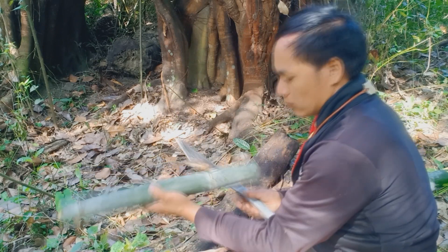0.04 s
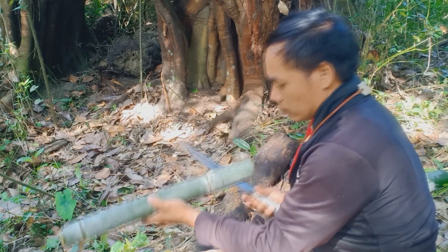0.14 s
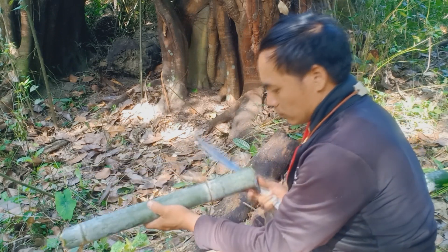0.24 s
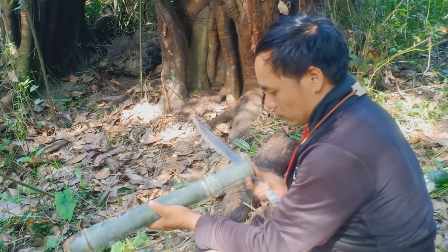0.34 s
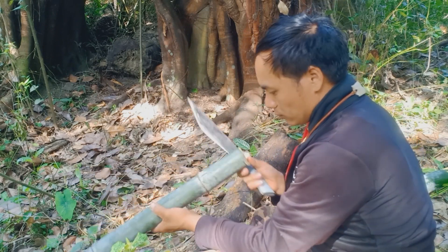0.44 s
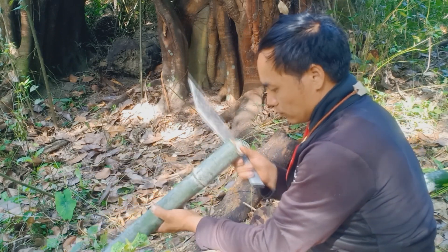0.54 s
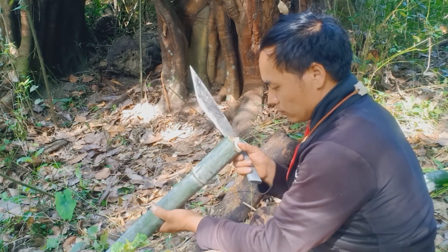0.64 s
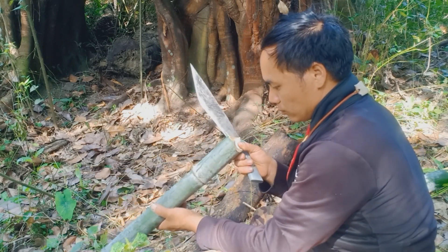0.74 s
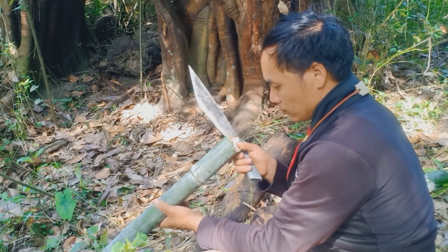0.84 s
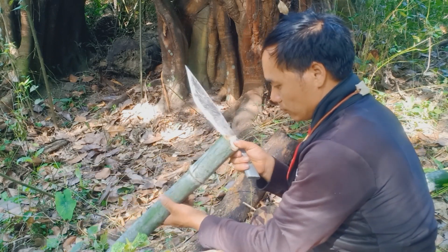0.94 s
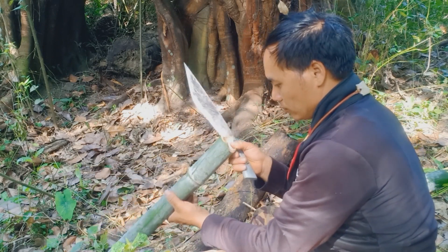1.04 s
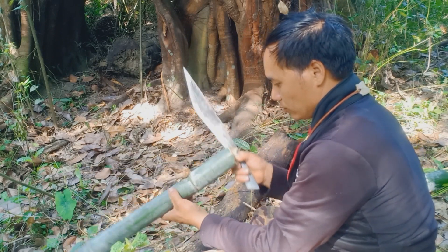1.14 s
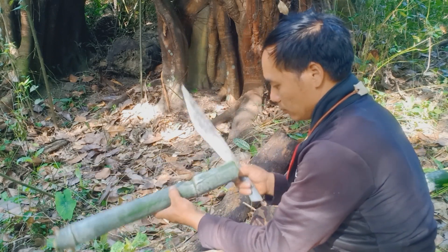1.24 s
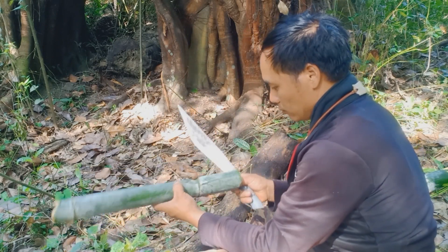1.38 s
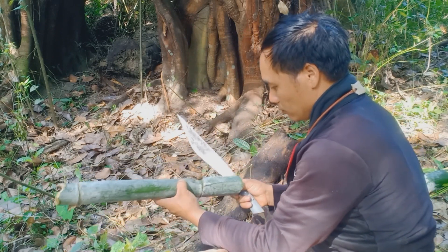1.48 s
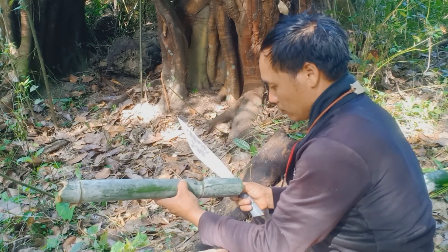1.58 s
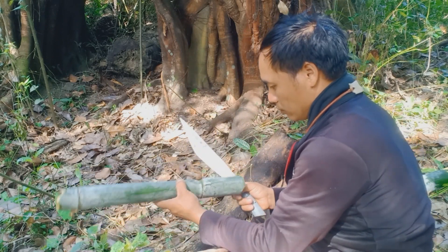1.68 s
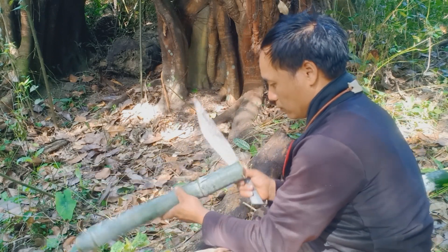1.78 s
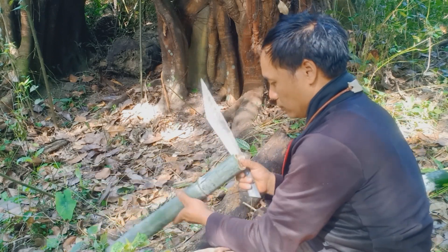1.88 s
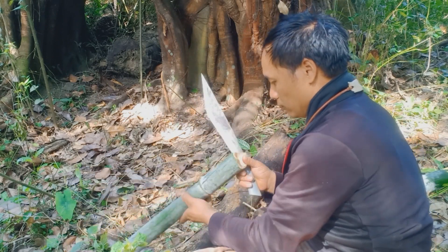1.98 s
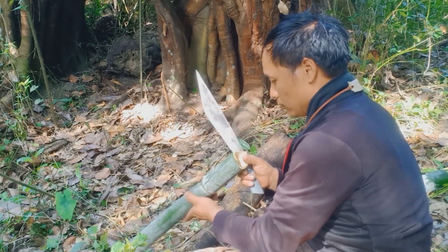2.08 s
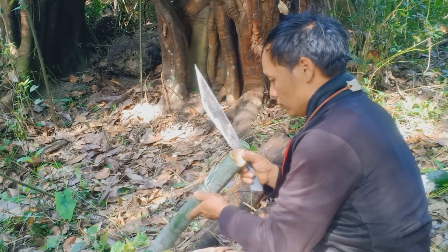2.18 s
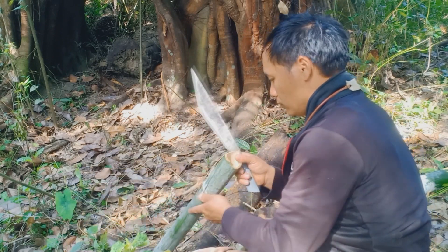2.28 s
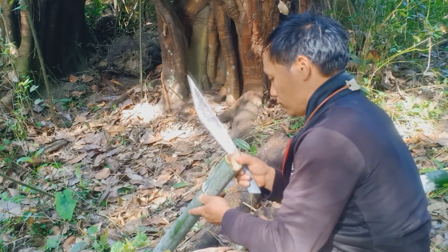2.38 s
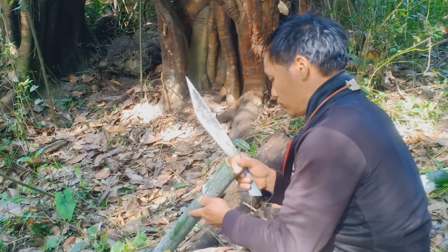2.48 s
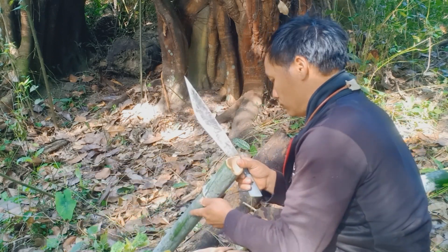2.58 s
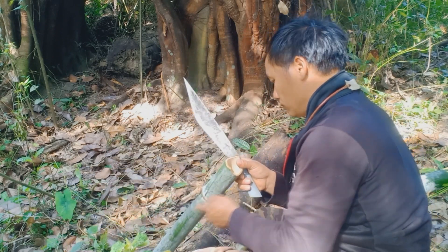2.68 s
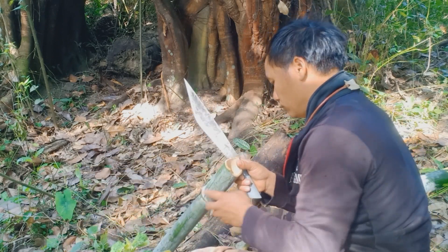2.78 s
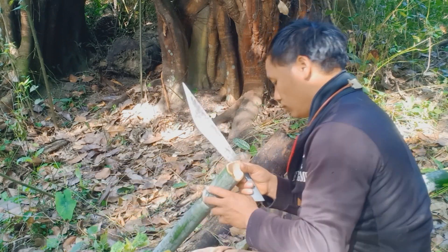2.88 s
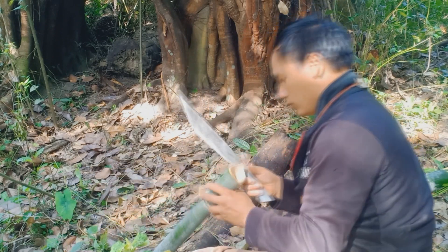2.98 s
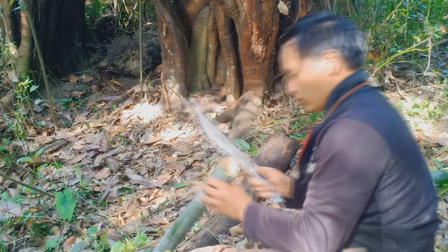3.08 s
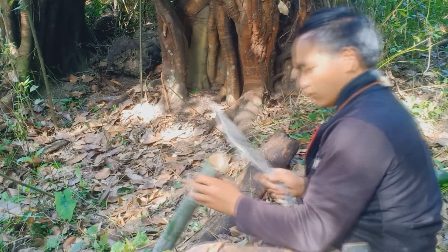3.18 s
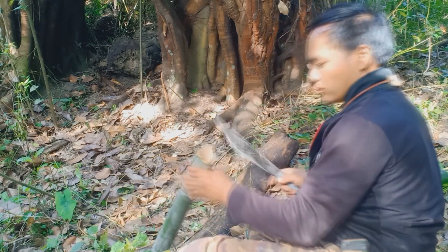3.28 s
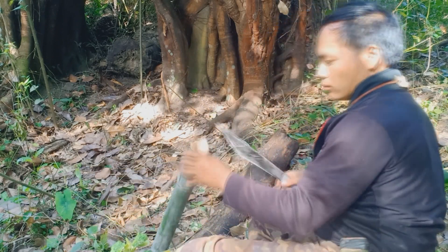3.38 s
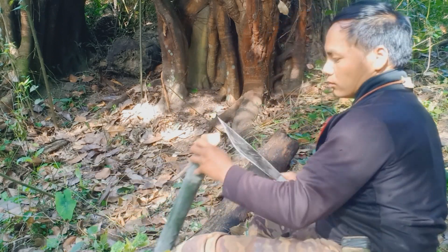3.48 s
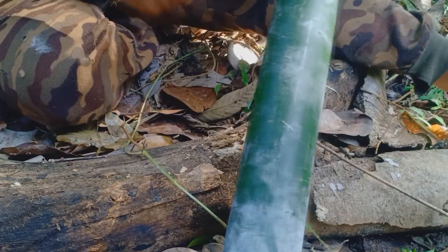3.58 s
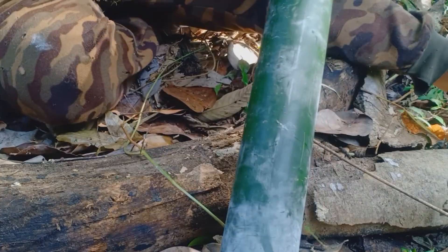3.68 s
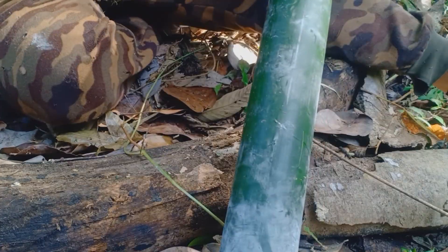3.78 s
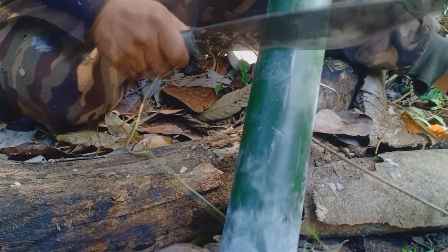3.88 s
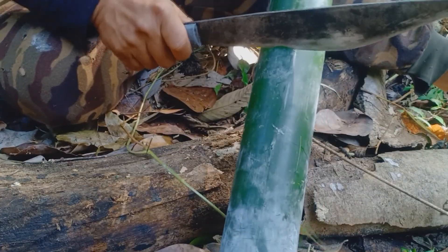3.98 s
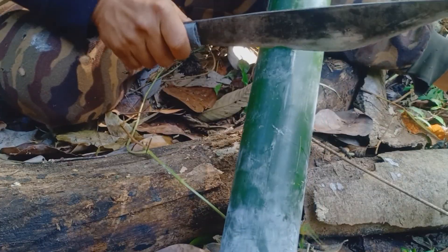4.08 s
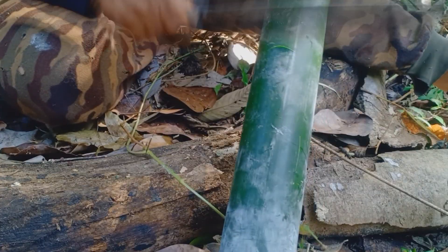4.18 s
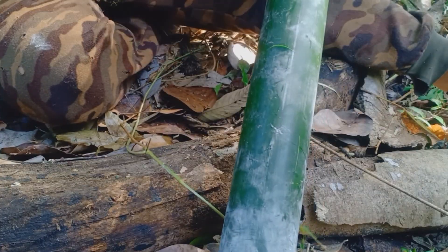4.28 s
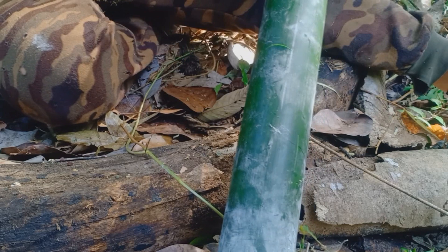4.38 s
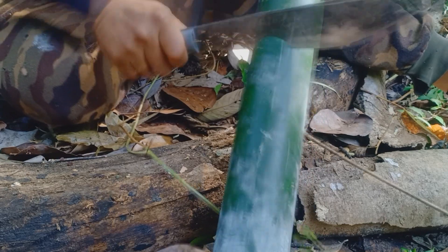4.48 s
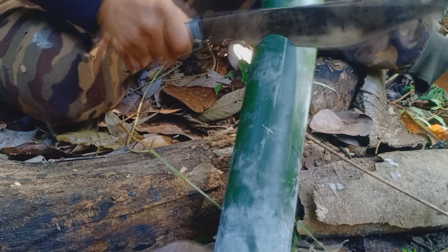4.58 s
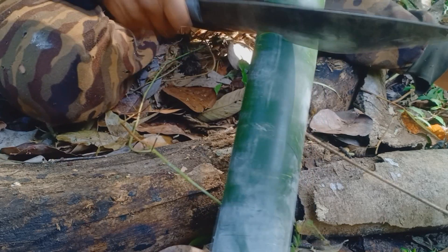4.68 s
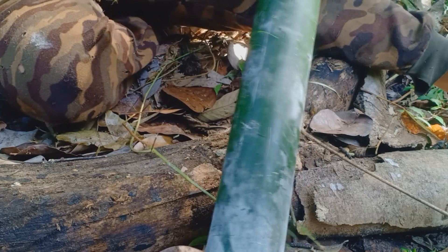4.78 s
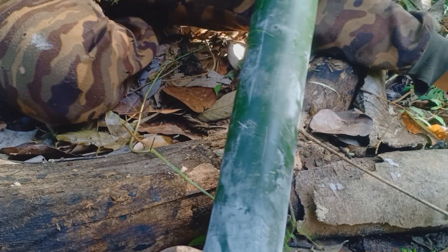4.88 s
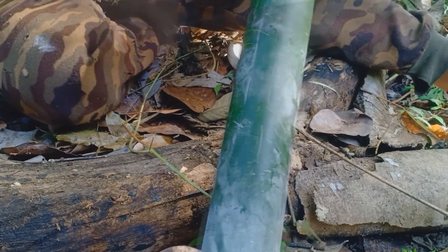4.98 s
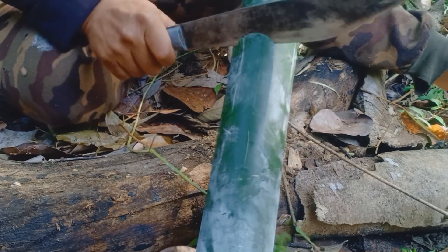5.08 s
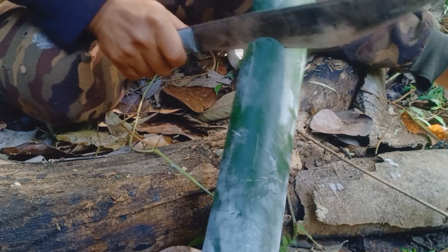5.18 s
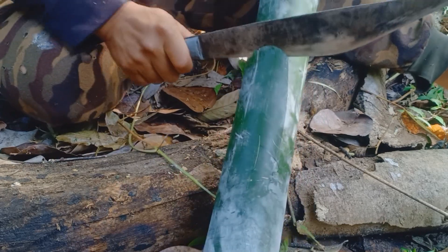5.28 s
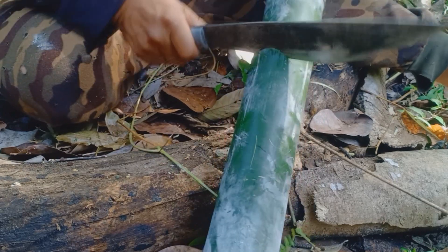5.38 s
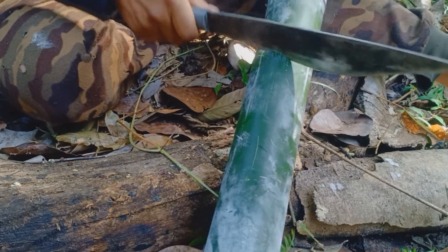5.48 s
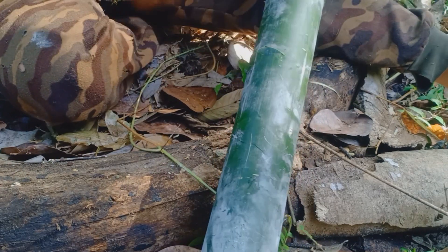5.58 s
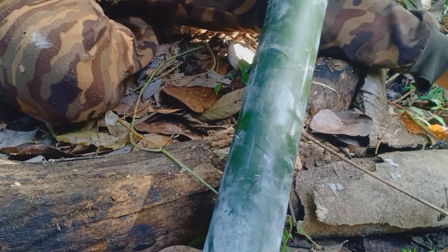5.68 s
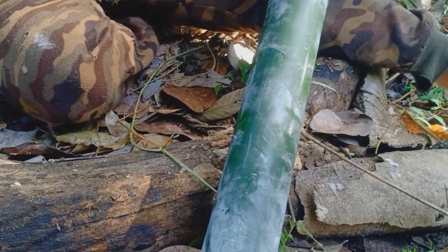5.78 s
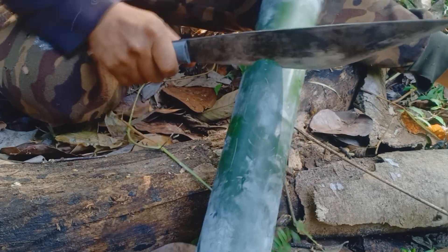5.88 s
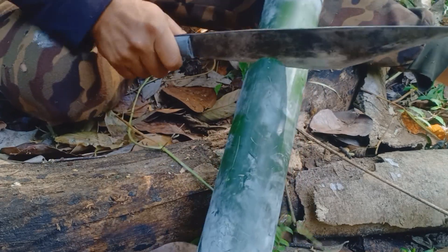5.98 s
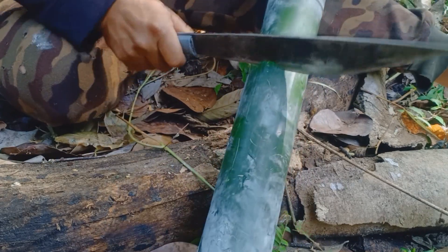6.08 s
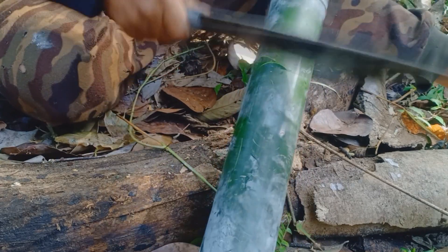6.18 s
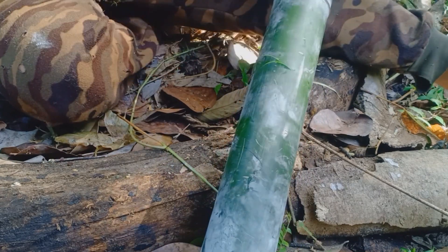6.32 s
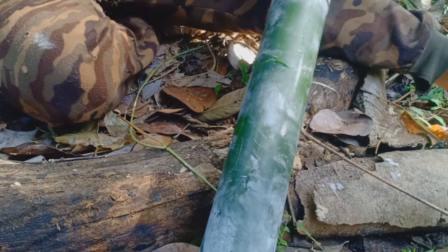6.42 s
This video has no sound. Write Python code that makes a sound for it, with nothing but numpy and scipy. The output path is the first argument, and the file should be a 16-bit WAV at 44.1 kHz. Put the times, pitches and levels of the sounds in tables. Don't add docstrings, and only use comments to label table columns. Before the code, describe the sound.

Outdoors on a forest floor, a faint hiss of air and insects with small birds chipping and whistling. A short bamboo piece is handled very quietly: leaf and cloth rustle, little hollow taps. Then, close to the microphone, a machete chops a bamboo pole four times, each blow preceded by a thin edge tick and followed by a low hollow ring, leaf crunch and woody snaps. A lone tick ends it.

```python
import sys
import numpy as np
from scipy import signal
from scipy.fft import rfft, irfft, next_fast_len
from scipy.io import wavfile
from scipy.ndimage import uniform_filter1d, minimum_filter1d

SR = 44100
rng = np.random.default_rng(int(sys.argv[2]) if len(sys.argv) > 2 else 0)


def bounce(signal):
    frames = np.transpose(np.atleast_2d(signal))
    limited = np.clip(frames, -1, 1)
    pcm = np.round(limited * 32767).astype(np.int16)
    wavfile.write(sys.argv[1], SR, pcm)


def ratio_of_db(decibels):
    return 10 ** (np.asarray(decibels, float) / 20)


N = 284445
HZ = np.arange(2049) * SR / 4096

# (time [s], peak [dB], wall ring [dB], low push [dB], pole note [dB])
CHOPS = [
    (3.893, -11.5, 6.5, -62, -26),
    (4.488, -5.5, 5, -33, -23),
    (5.027, -5, 2.5, -42.5, -23),
    (5.881, -5.5, 3.5, -40.5, -23.5),
]
# (time [s], peak [dB], ring [dB], hold [s])
TICKS = [
    (3.791, -19, 10, 0.0026),
    (4.385, -27, 11, 0.0027),
    (4.92, -24, 7.5, 0.0022),
    (5.789, -20, 3.5, 0.0021),
    (6.417, -22, 7.5, 0.00087),
]
# (frequency [Hz], level per Hz [dB])
LEAVES = [(70, -27.5), (190, -2.5), (330, -2.5), (780, 6.5), (1270, 1.5), (1620, 1.5), (1910, 6),
          (2510, 5.5), (3710, -3), (5050, 2), (8360, -32), (8770, -35.5), (13600, -30.5), (16000, -30.5)]
# (frequency [Hz], level per Hz [dB])
TREES = [(190, -50), (320, -0.5), (383, -19.5), (750, -5), (1490, -10.5), (1780, -3), (2400, -1),
         (3490, -5), (5010, 0), (9630, -31), (13600, -19), (15200, -31), (16000, -64.5)]


def at_hz(points, hz):
    points_hz, level_db = np.transpose(points)
    return np.interp(np.log(hz + 1), np.log(points_hz), level_db)


def shape(x, gain):
    cepstrum = irfft(np.log(gain + 3e-4))
    cepstrum[1:2048] *= 2
    cepstrum[2049:] = 0
    impulse = irfft(np.exp(rfft(cepstrum)))[None, :3000]
    return signal.fftconvolve(x, impulse, axes=-1)[..., :x.shape[-1]]


def colour(x, spectrum):
    return shape(x, ratio_of_db(at_hz(spectrum, HZ)))


def highpass(x, hz, order=2):
    return signal.sosfilt(signal.butter(order, hz, "high", fs=SR, output="sos"), x)


def peak_one(x):
    return x / np.max(np.abs(x))


def rms_one(x):
    return x / np.sqrt(np.mean(x ** 2) + 1e-30)


def resonate(x, hz, width_hz):
    r = np.exp(-np.pi * width_hz / SR)
    poles = [1, -2 * r * np.cos(2 * np.pi * hz / SR), r * r]
    return signal.lfilter([(1 - r * r) / 2, 0, (r * r - 1) / 2], poles, x)


def drift(rate, count):
    knots = rng.standard_normal((count, 400))
    at = np.arange(N) / SR * rate
    return np.array([np.interp(at, np.arange(400), k) for k in knots])


def add(out, sound, s):
    i = round(s * SR)
    out[..., i:i + sound.shape[-1]] += sound[..., :N - i]


def forest():
    # (frequency [Hz], level per Hz [dB])
    hiss = [(24, -35.5), (40, -19), (54, -14.5), (91, -12), (429, -15), (536, -13.5), (1390, -21),
            (2170, -16.5), (3580, -24.5), (4950, -22.5), (7750, -35.5), (9710, -38), (11300, -37.5),
            (13800, -35.5), (15600, -35)]
    # (frequency [Hz], likeness [0 to 1, below 0 counts as 0])
    likeness = [(60, 0.8), (180, 0.26), (550, 0.26), (1650, -0.4), (4970, -9), (15000, -5)]
    size = next_fast_len(N)
    hz = np.arange(size // 2 + 1) * SR / size
    alike = np.clip(at_hz(likeness, hz), 0, 1)
    mid, side = rfft(rng.standard_normal((2, size))) * ratio_of_db(at_hz(hiss, hz))
    common, apart = np.sqrt(1 + alike) * mid, np.sqrt(1 - alike) * side
    both = np.array([common + apart, common - apart])
    edges_hz = [0, 150, 600, 1500, 3500, 7000, SR]
    wander = ratio_of_db(0.82 * drift(9.4, count=6) + 0.49 * drift(16, count=6))
    air = np.zeros((2, N))
    for gain, low, high in zip(wander, edges_hz, edges_hz[1:]):
        air += gain * irfft(both * (hz >= low) * (hz < high), size)[:, :N]
    return ratio_of_db(-70.5) * rms_one(air)


def birds():
    # (time [s], length [s], start pitch [Hz], end pitch [Hz], level [dB])
    whistles = [(0.211, 0.11, 6750, 5650, -74), (0.286, 0.078, 5660, 5500, -74.5),
                (0.381, 0.062, 5050, 5050, -69.5), (0.447, 0.046, 5560, 5790, -76),
                (0.523, 0.025, 4450, 4560, -70), (0.36, 0.024, 5270, 4840, -78),
                (1.391, 0.064, 5460, 5210, -73), (1.431, 0.041, 4930, 5060, -66),
                (1.463, 0.043, 3950, 4070, -77), (1.506, 0.062, 5230, 5890, -77),
                (1.554, 0.077, 4820, 4610, -70.5), (2.055, 0.068, 2170, 2110, -76.5),
                (2.206, 0.02, 4800, 4690, -71), (2.435, 0.014, 5720, 5800, -72.5),
                (3.335, 0.038, 4670, 5130, -64), (3.402, 0.074, 5500, 5800, -75),
                (3.504, 0.033, 4500, 4610, -69), (0.424, 0.044, 4020, 3960, -82),
                (0.338, 0.032, 6200, 6960, -82)]
    out = np.zeros(N)
    for s, length, start_hz, end_hz, db in whistles:
        u = np.linspace(0, 1, round(length * SR))
        hz = start_hz + (end_hz - start_hz) * u ** 0.27
        knots = rng.standard_normal(60) + 1j * rng.standard_normal(60)
        paths = np.interp(u * length * 300, np.arange(60), knots)
        tone = np.real((0.16 + paths) * np.exp(2j * np.pi * np.cumsum(hz) / SR))
        add(out, ratio_of_db(db) * np.sin(np.pi * u) ** 0.5 * tone, s)
    return out


def chips():
    # (time [s], top pitch [Hz], level [dB])
    calls = [
        (.198, 5030, -60.5),
        (.622, 5010, -60.5),
        (1.064, 4890, -60.5),
        (1.422, 4910, -63.5),
        (1.812, 4860, -65),
        (2.107, 4880, -63.5),
        (2.484, 4930, -61),
        (3.052, 4920, -64),
        (3.472, 4930, -60),
    ]
    out, t = np.zeros(N), np.arange(-.008, .012, 1 / SR)
    for s, top_hz, db in calls:
        rise = 0.33 * np.clip(-t / 0.0074, 0, 1) ** 1.3
        hz = top_hz * (1 - rise - 11 * np.maximum(t - .003, 0))
        level = ratio_of_db(np.where(t < 0, 2600 * t, -1500 * np.maximum(t - .004, 0)))
        level = level * np.clip((.012 - t) / 0.0022, 0, 1)
        add(out, ratio_of_db(db) * level * np.sin(2 * np.pi * np.cumsum(hz) / SR), s - .007)
    return out


def struck(events):
    out = np.zeros(N)
    for s, peak_db, *_ in events:
        out[round(s * SR)] = ratio_of_db(peak_db)
    return out


def scatter(x, t60, start_s, lumpy_db):
    t = np.arange(SR // 2) / SR
    lumps = ratio_of_db(lumpy_db * np.interp(t * 250, np.arange(126), rng.standard_normal(126)))
    tail = rng.standard_normal((2, len(t))) * lumps * ratio_of_db(-60 * t / t60) * np.minimum(t / start_s, 1)
    tail = tail / np.sqrt(np.sum(tail ** 2) / 2)
    return signal.fftconvolve(x[None], tail, axes=1)[:, :N]


def swells(rows):
    step = 16
    t, low, treble = np.arange(0, N, step) / SR, 0, 0
    for s, rise, fall, db, bright_db in rows:
        away = np.where(t < s, (s - t) / rise, (t - s) / fall)
        power = ratio_of_db(db - 20 * away) ** 2
        low = low + power
        treble = treble + power * ratio_of_db(bright_db) ** 2
    return np.repeat(np.sqrt([low, treble]), step, axis=1)[:, :N]


def rustle():
    # (top time [s], rise [s], fall [s], rustle level [dB], brightness [dB])
    stirs = [(0.11, 0.069, 0.23, -83, 6.5), (0.48, 0.18, 0.23, -77, 1), (1.0, 0.2, 0.39, -75, 4),
             (1.65, 0.054, 0.14, -72.5, -25), (1.77, 0.17, 0.17, -71, -19), (1.906, 0.021, 0.034, -63, -12),
             (2.27, 0.31, 0.13, -69, 2.5), (2.33, 0.046, 0.039, -69, -4), (2.5, 0.12, 0.18, -77, -20),
             (2.72, 0.24, 0.58, -79, 7), (2.93, 0.012, 0.073, -63, -22), (2.97, 0.067, 0.071, -64, 2),
             (3.05, .1, 0.42, -76.5, 1.5), (3.39, 0.37, 0.1, -76.5, 4.5), (3.574, 0.046, 0.033, -71, -5),
             (3.635, 0.048, 0.031, -68.5, -1), (3.678, 0.017, 0.043, -49, -21),
             (3.76, 0.017, 0.076, -66, -20)]
    # (top time [s], rise [s], fall [s], rustle level [dB], brightness [dB])
    shifts = [(3.999, 0.034, 0.071, -56, -20), (4.151, 0.82, 0.14, -67, -4), (4.27, 0.029, .1, -71, -10.5),
              (4.549, 0.044, 0.11, -45.5, -2), (4.69, 0.11, 0.33, -50.5, -6), (4.764, 0.044, 0.017, -41, 0),
              (4.792, 0.059, 0.049, -52, -5), (5.09, 0.037, 1, -57, -5), (5.378, 0.094, 0.094, -49, -5.5),
              (5.428, 0.04, 0.024, -51, -2.5), (5.51, 0.13, 0.097, -57, -7),
              (5.556, 0.029, 0.088, -48, -4.5), (5.772, 0.055, 0.025, -63, -6.5),
              (5.94, 0.15, 0.67, -51, -6), (6.201, 0.15, 0.03, -57.5, -1.5), (6.3, 0.17, 0.019, -60, -0.5),
              (6.4, 0.034, .03, -89, 5)]
    low_gain, treble_gain = swells(stirs + shifts)
    born = rng.random((2, N)) < 1700 * ratio_of_db(5 * drift(60, count=1)) / SR
    strength = ratio_of_db(3.7 * np.minimum(rng.exponential(1, (2, N)), 5))
    coarse = born * strength * rng.choice([-1, 1], (2, N))
    bed = ratio_of_db(-3) * rng.standard_normal((2, N)) * ratio_of_db(3 * drift(30, count=1))
    mid, side = rms_one(coarse) + bed
    grains = rms_one(colour(np.array([mid + 0.81 * side, mid - 0.13 * side]), LEAVES))
    top = highpass(grains, 7000, order=4)
    return ratio_of_db(-1.5) * (low_gain * (grains - top) + treble_gain * top * ratio_of_db(20.5))


def scrapes():
    # (time [s], length [s], frequency [Hz], width [Hz], level [dB])
    rubs = [(3.642, 0.011, 3740, 300, -64), (3.669, 0.019, 880, 149, -51.5), (4.168, 0.039, 834, 121, -66),
            (4.178, 0.014, 2520, 302, -66), (4.344, 0.046, 4640, 608, -75), (5.327, 0.047, 800, 200, -61),
            (5.349, 0.068, 2280, 400, -56.5), (5.361, .065, 5180, 400, -61), (5.365, 0.052, 3600, 250, -63),
            (5.368, 0.053, 4040, 250, -62), (5.498, 0.059, 1010, 200, -65.5),
            (5.503, 0.036, 3240, 250, -71), (5.562, 0.045, 590, 250, -56), (6.172, 0.015, 1920, 250, -65),
            (6.184, 0.016, 2240, 200, -66), (6.198, 0.019, 1140, 200, -59),
            (6.248, 0.094, 2260, 200, -64.5), (6.272, 0.028, 4960, 350, -61), (6.275, 0.024, 930, 150, -75)]
    out = np.zeros((2, N))
    for s, length, hz, width_hz, db in rubs:
        mid, side = rng.standard_normal((2, SR // 8))
        noise = np.array([mid + 0.32 * side, mid - 0.51 * side])
        rub = rms_one(resonate(resonate(noise, hz, width_hz), hz, width_hz))
        u = np.linspace(0, 1, round(length * SR))
        stroke = np.sin(np.pi * u ** 0.53) ** 0.31
        add(out, ratio_of_db(db) * stroke * rub[:, -len(u):], s)
    return out


def body(spectrum, modes, ring_db):
    rings = 0
    for hz, width_hz, db in modes:
        rings = rings + ratio_of_db(db) ** 2 / (1 + (2 * (HZ - hz) / (1.16 * width_hz)) ** 2) ** 2
    return np.sqrt(rings + ratio_of_db(at_hz(spectrum, HZ) - ring_db) ** 2)


def splinter(rise_s, hold_s, t60, after_db, after_t60, gain=np.ones(2049), lag_s=0):
    t = np.arange(6000) / SR
    rise = np.minimum(t / rise_s, 1) ** 2
    envelope = (rise * ratio_of_db(-60 * np.maximum(t - rise_s - hold_s, 0) / t60))[:4096]
    noise = rng.standard_normal((2, 2, len(t)))
    burst = noise[0, :, :4096] * envelope
    for _ in range(8):
        burst = irfft(gain * np.exp(1j * np.angle(rfft(burst))))
        burst = burst * envelope / np.sqrt(uniform_filter1d(burst ** 2, size=71) + 1e-14)
    crackle = noise[1] * rise * ratio_of_db(after_db - 60 * t / after_t60)
    crackle = signal.sosfilt(signal.butter(2, 7000, fs=SR, output="sos"), crackle)
    both = shape(crackle, gain) / np.sqrt(np.mean(gain ** 2))
    phase = 2 * np.pi * HZ[1] * np.cumsum(lag_s + 0 * HZ)
    both[:, :4096] += irfft(rfft(burst) * np.exp(-1j * phase))
    mid, side = both
    side = highpass(side, 2600) * ratio_of_db(0.5)
    return np.array([mid + side, mid - side])


def knocks():
    # (time [s], peak [dB], ringing [Hz], ring [dB], crack t60 [s])
    snaps = [(4.158, -55, 1200, -3, .01), (4.177, -52.5, 794, -6, .02), (4.275, -43.5, 3820, 14, 0.0098),
             (4.296, -49, 426, -8.5, .01), (4.678, -44, 5500, 10, 0.005), (4.726, -32, 2300, -12, 0.02),
             (4.74, -27.5, 2080, -7, 0.0069), (4.745, -30, 1400, -13, 0.016),
             (4.757, -30.5, 1850, -10, 0.032), (4.787, -36, 3180, -2, 0.0084),
             (4.813, -43, 1700, -13, 0.021), (4.843, -51, 2500, -13, .008), (4.876, -61, 2800, -4, 0.0084),
             (4.909, -51, 923, -13.5, 0.012), (4.997, -55, 2580, -14, 0.011),
             (5.241, -40, 2030, -10, 0.023), (5.31, -52, 810, 9, 0.011), (5.328, -47, 1870, 6, 0.012),
             (5.221, -40.5, 4030, 2, 0.0091), (6.28, -51, 5130, 4, 0.0074), (5.362, -42, 2430, -16, 0.011),
             (5.426, -43, 770, 3, 0.036), (5.493, -43, 1300, -9, 0.021), (5.551, -34, 2150, -5, 0.023),
             (5.566, -53, 704, -5, 0.03), (5.604, -39.5, 5000, 7, 0.0061),
             (5.64, -38.5, 2770, -1.5, 0.0081), (5.721, -60, 2370, -3.5, .014),
             (5.759, -46, 2850, -9, 0.016), (6.074, -46.5, 1770, -9, 0.032),
             (6.118, -37, 2300, -21, 0.0066), (6.156, -51, 744, -6, .012), (6.208, -40, 1880, 6, 0.017)]
    # (time [s], peak [dB], ringing [Hz], ring [dB])
    handling = [(0.143, -56, 1810, -5), (0.156, -52, 1800, -27), (0.966, -55, 1760, -3),
                (1.269, -45, 1920, 8), (1.753, -50.5, 2320, -14), (1.768, -59, 2420, 0),
                (1.91, -53, 1340, -14), (2.302, -40.5, 2440, 2), (2.929, -65, 640, 12),
                (2.944, -58, 596, -1), (2.969, -50.5, 1900, -1), (2.985, -67, 736, 2),
                (3.272, -48.5, 4770, 10), (3.549, -54, 4500, 9), (3.645, -41, 2000, -1),
                (3.668, -35.5, 850, -18), (3.756, -52, 2360, -26)]
    # (time [s], peak [dB], ringing [Hz], ring t60 [s], ring [dB])
    hollow = [
        (1.2617, -39.5, 1370, 0.094, -16.5),
        (1.265, -52.5, 576, 0.25, 0),
        (1.649, -51, 573, 0.15, -6.5),
        (1.899, -66, 612, 0.14, 6),
        (2.309, -45.5, 196, 0.044, 6),
        (3.666, -57, 159, 0.095, 9),
    ]
    cycles = 20
    rows = [(s, db, hz, cycles / hz, ring_db, crack_t60) for s, db, hz, ring_db, crack_t60 in snaps]
    rows += [(s, db, hz, cycles / hz, ring_db, .011) for s, db, hz, ring_db in handling]
    rows += [(*row, .008) for row in hollow]
    out = np.zeros((2, N))
    for s, peak_db, hz, t60, ring_db, crack_t60 in rows:
        force = splinter(.0003, crack_t60 / 14, crack_t60, -9, 2.5 * crack_t60)
        ring = resonate(force, hz, np.log(1000) / np.pi / t60)
        sound = peak_one(colour(force, LEAVES)) + ratio_of_db(ring_db) * peak_one(ring)
        add(out, ratio_of_db(peak_db) * peak_one(sound) * ratio_of_db([[.3], [-.3]]), s - .0006)
    return out


def swings():
    out, u = np.zeros((2, N)), np.linspace(0, 1, SR // 25)
    for s, *_ in CHOPS:
        rush = rms_one(colour(rng.standard_normal((2, len(u))), TREES))
        add(out, ratio_of_db(-62) * u * rush, s - len(u) / SR)
    return out


def ticks():
    # (frequency [Hz], level per Hz [dB])
    thin_crack = [(180, -49.5), (300, -25), (1210, -15), (2100, -2.5), (2570, 1), (3460, -5), (4520, 0),
                  (6850, -13), (8500, -26), (14000, -21), (16000, -29.5)]
    # (frequency [Hz], width [Hz], level [dB])
    edge_modes = [
        [(2580, 150, -6), (3250, 100, -11.5), (4500, 150, -0.5), (4920, 140, -1.5), (5690, 140, -12),
         (6660, 320, -9)],
        [(1850, 250, -7), (2340, 69, -11), (3120, 270, -4), (3820, 190, -8), (4500, 180, 1.5), (6890, 120, -23)],
        [(3030, 120, 1), (3770, 180, -1), (4680, 160, 2.5), (5640, 96, -7), (6610, 250, -9), (7750, 140, -26)],
        [(2640, 130, 9), (3930, 86, -14), (4600, 290, -6), (5650, 110, -3), (6660, 140, -11), (7400, 100, -19)],
        [(1480, 120, -20), (2630, 380, 1), (3740, 100, -3), (4424, 120, 0.5), (6700, 170, -20),
         (7900, 330, -19)],
    ]
    lag_s = .0008 * np.clip((HZ - 3500) / 600 + .5, 0, 1)
    out = np.zeros((2, N))
    for (s, peak_db, ring_db, hold_s), modes in zip(TICKS, edge_modes):
        sound = splinter(0.00067, hold_s, 0.022, -16.0, 0.13, body(thin_crack, modes, ring_db), lag_s)
        add(out, ratio_of_db(peak_db) * peak_one(sound), s + .0003)
    return out


def chops():
    note_t60s = [0.55, 0.52, 0.54, 0.56]
    # (frequency [Hz], width [Hz], level [dB])
    walls = [
        [(399, 85, 1), (837, 110, 2.5), (1272, 62, -6), (1840, 260, -3), (2350, 100, -4.5), (2670, 240, -12.5),
         (3550, 97, -28.5), (3960, 90, -24.5), (4450, 110, -8), (5230, 150, -8.5), (5130, 48, -15.5),
         (5400, 150, -21.5), (6330, 150, -27)],
        [(850, 180, -1), (1200, 81, -0.5), (1800, 81, -8), (2050, 96, -1), (2487, 150, 0), (2850, 210, -6),
         (3420, 210, -12.5), (3830, 340, -14), (4520, 65, -3), (4775, 190, -11), (5670, 320, -11),
         (6250, 44, -19.5), (6920, 160, -23)],
        [(660, 210, -4), (1000, 120, -2), (1333, 71, -3), (1754, 180, 2.5), (2535, 180, 0.5), (3080, 110, -7),
         (3980, 58, -18), (4170, 89, -6), (4370, 170, -16), (5100, 74, -15.5), (4960, 76, -8.5),
         (6040, 140, -21), (6700, 140, -30.5)],
        [(362, 92, -5.5), (744, 206, -2), (1812, 105, -2), (2150, 130, -3), (2825, 240, -8.5), (3254, 280, -8),
         (3870, 72, -15), (4150, 47, -8), (4640, 110, -8), (5120, 450, -13),
         (6020, 320, -19)] + [(1100, 110, -8), (1280, 100, -6)],
    ]
    # (frequency [Hz], level per Hz [dB])
    cracks = [
        [(150, -12), (805, -2), (1480, -9.5), (2360, -13.5), (5000, -18), (9260, -42), (13800, -30.5),
         (16000, -47.5)],
        [(88, -35.5), (150, -5), (2500, -6.5), (3100, -12.5), (4860, -8), (9630, -36), (14800, -28),
         (16000, -35.5)],
        [(88, -42), (150, -11), (2550, -6.5), (3490, -15), (5150, -7.5), (7180, -33.5), (14200, -31.5),
         (16000, -54)],
        [(150, -9), (745, -6), (3160, -12.5), (3490, -16.5), (6000, -21.5), (8500, -39), (15200, -30.5),
         (16400, -36)],
    ]
    # (hold [s], crack t60 [s], after-crackle [dB], wall lag [cycles], push left-right [dB])
    bites = [
        (0.0037, 0.043, -16.5, 1.3, 1.5),
        (0.0048, 0.035, -14, .6, 8),
        (0.002947, 0.028, -15.5, 1.7, 5),
        (0.004, 0.0274, -20, 1.5, 7),
    ]
    # (frequency [Hz], width [Hz], depth [0-1])
    dips = [
        [(488, 110, .75), (1540, 140, 0.8)],
        [(485, 180, 0.24), (1490, 75, 1)],
        [(442, 130, .9), (1510, 100, 0.5)],
        [(506, 94, .8), (1470, 87, 1)],
    ]
    note_hz, note_rise_s = 250.9, 0.0078
    treble_hz, treble_hold_s, treble_t60 = 3800, 0.0031, 0.021
    out, t = np.zeros((2, N)), np.arange(SR) / SR
    for chop, note_t60, wall, crack, bite, quiet in zip(CHOPS, note_t60s, walls, cracks, bites, dips):
        s, peak_db, wall_db, push_db, note_db = chop
        hold_s, t60, after_db, lag, pan_db = bite
        gain = body(crack, wall, wall_db)
        for hz, width_hz, depth in quiet:
            gain = gain * (1 - np.clip(depth, 0, .95) / (1 + (2 * (HZ - hz) / width_hz) ** 2))
        lag_s = np.minimum(lag / (HZ + 1), .0025)
        knock = highpass(splinter(0.0012, hold_s, t60, after_db, 0.094, gain, lag_s), 170, order=3)
        top = highpass(knock[:, ::-1], treble_hz)[:, ::-1]
        top = highpass(top, treble_hz)
        fade_db = -60 * np.maximum(t[:knock.shape[1]] - treble_hold_s, 0) / treble_t60
        knock = knock + top * (1.16 * ratio_of_db(np.maximum(fade_db, -7.0)) - 1)
        knock = knock + [[.2], [-.2]] * resonate(knock, 2600, 1100)
        add(out, ratio_of_db(peak_db + 12.0) * rms_one(knock) / 7, s - .0003)
        push = ratio_of_db(push_db + 33.0 - 60 * t / 0.023) * np.sin(2 * np.pi * 100 * t)
        add(out, push * ratio_of_db(np.clip([[pan_db / 2], [-pan_db / 2]], -1.8, 1.8)), s + 0.002)
        note = ratio_of_db(note_db - 60 * t / note_t60) * np.sin(2 * np.pi * note_hz * t)
        add(out, note * (1 - np.exp(-t / note_rise_s)), s)
    return out


def scene():
    song, chip = birds(), chips()
    blows = highpass(chops(), 62, order=3)
    blows[0] = np.roll(blows[0], shift=1)
    tails = ratio_of_db(12.0) * scatter(struck(CHOPS), t60=0.35, start_s=0.026, lumpy_db=0.0)
    edge = ratio_of_db(7) * scatter(struck(TICKS), t60=0.33, start_s=0.0022, lumpy_db=1.2)
    tails += edge + ratio_of_db(5.5) * resonate(edge, 6700, 600)
    song = ratio_of_db(-1.5) * song + ratio_of_db(5.5) * scatter(song, t60=1.0, start_s=0.0051, lumpy_db=5.5)
    chip_tail = ratio_of_db(4.0) * scatter(chip, t60=0.58, start_s=0.0025, lumpy_db=-6.0)
    chip = chip * ratio_of_db([[-.7], [.7]]) + chip_tail
    near = blows + swings() + ticks()
    faint = colour(tails, TREES) + knocks() + rustle() + song + chip + forest() + scrapes()
    near = signal.sosfilt(signal.cheby2(8, 40, 16350, fs=SR, output="sos"), near)
    return near + signal.sosfilt(signal.cheby2(10, 40, 15900, fs=SR, output="sos"), faint)


def top_cut(x):
    return signal.sosfilt(signal.butter(12, 16520, fs=SR, output="sos"), x)


def record(dry):
    over_db = np.maximum(20 * np.log10(np.abs(dry).max(0) + 1e-9) + 14, 1e-3)
    ahead_db = -minimum_filter1d(-np.minimum(0.68 * over_db, 17), size=851, origin=-425)
    release = np.arange(N) / SR / .075
    held_db = np.exp(np.maximum.accumulate(np.log(ahead_db) + release) - release)
    ducked = (dry + .00045) * ratio_of_db(-uniform_filter1d(held_db, size=301))
    return top_cut(0.56 * np.tanh(ducked / 0.57))


dry = scene()
out = record(dry)
bounce(out)
```